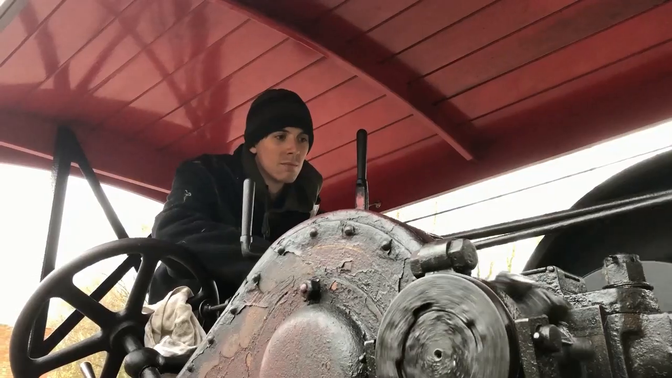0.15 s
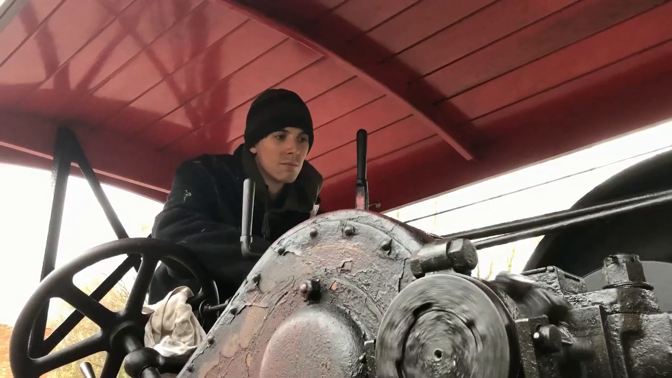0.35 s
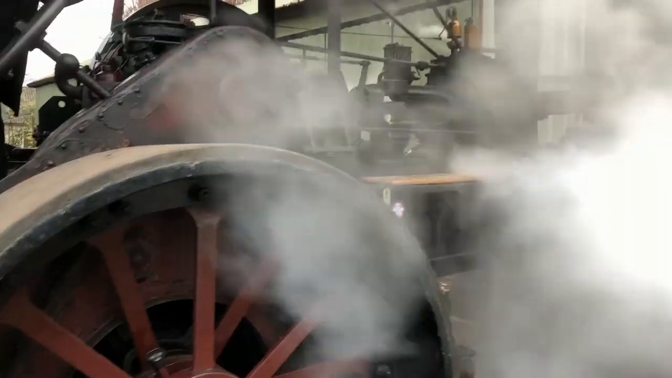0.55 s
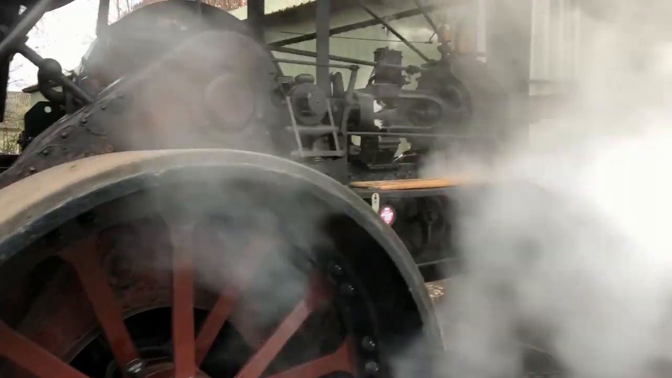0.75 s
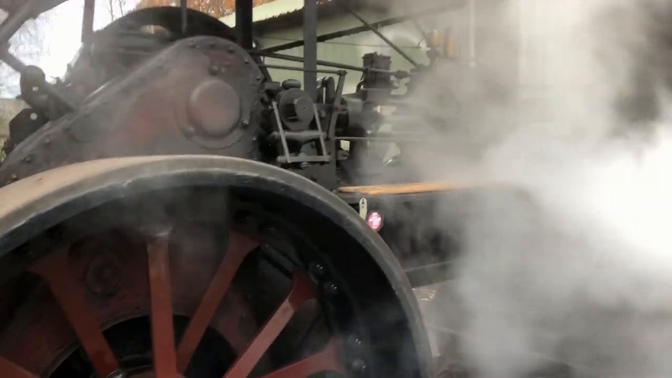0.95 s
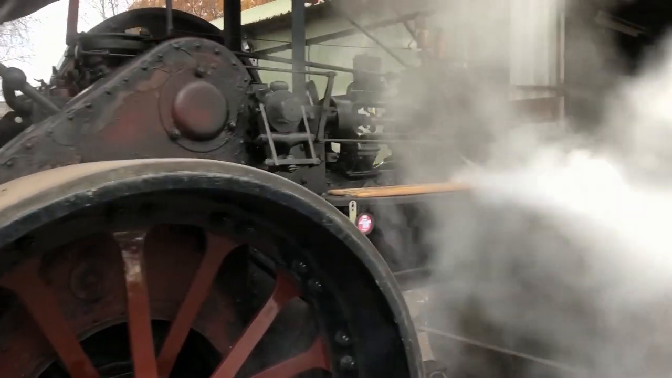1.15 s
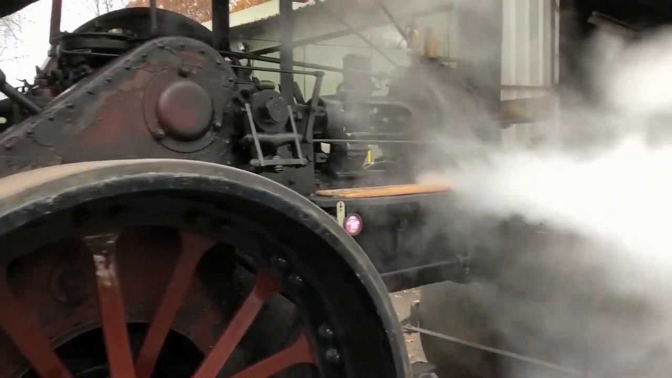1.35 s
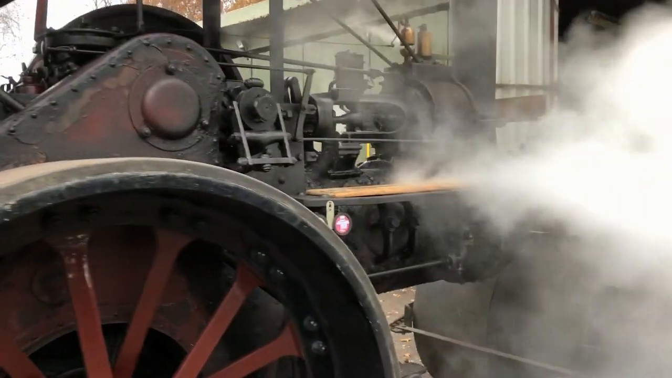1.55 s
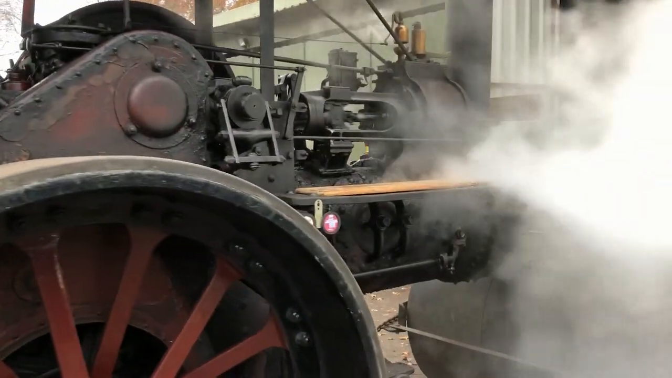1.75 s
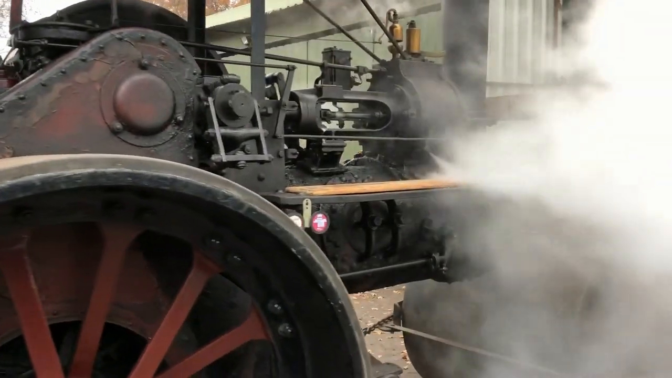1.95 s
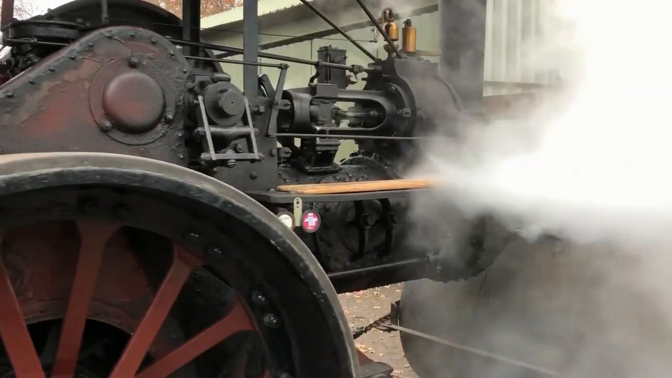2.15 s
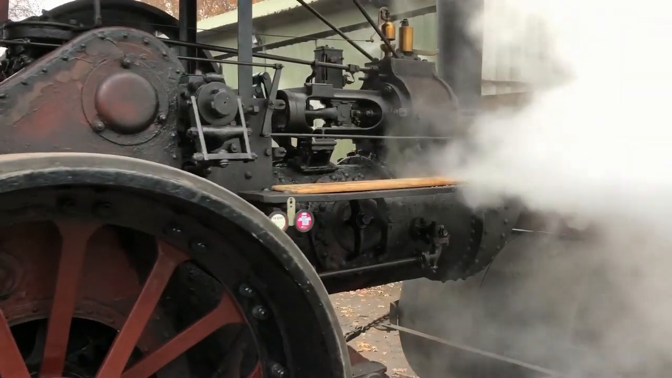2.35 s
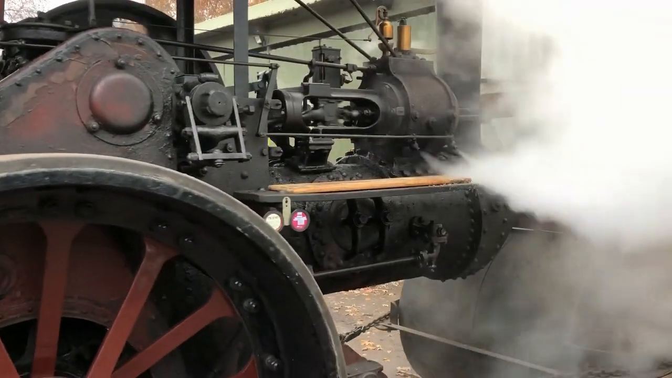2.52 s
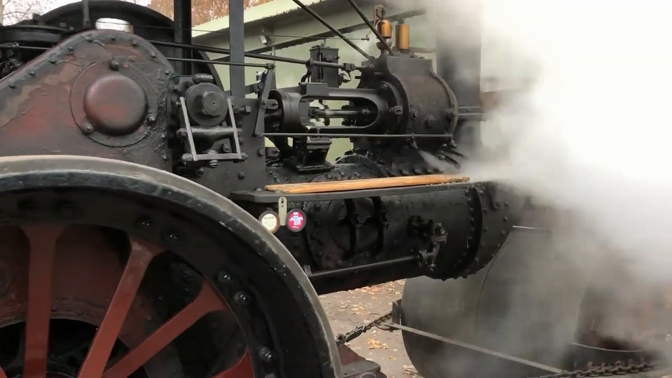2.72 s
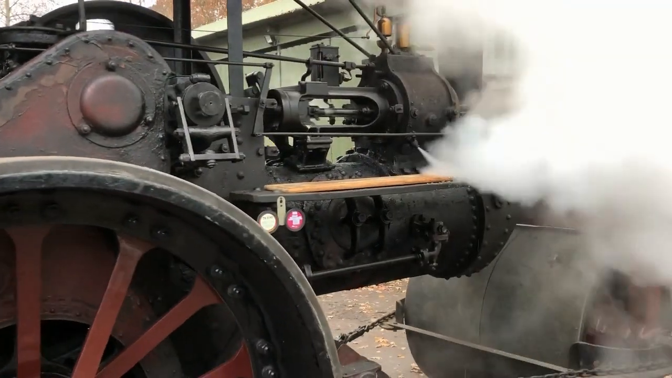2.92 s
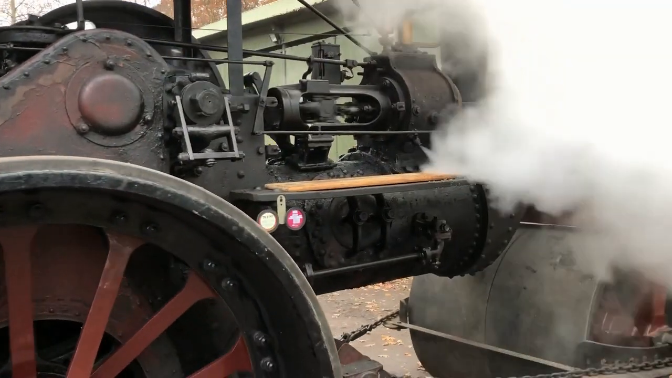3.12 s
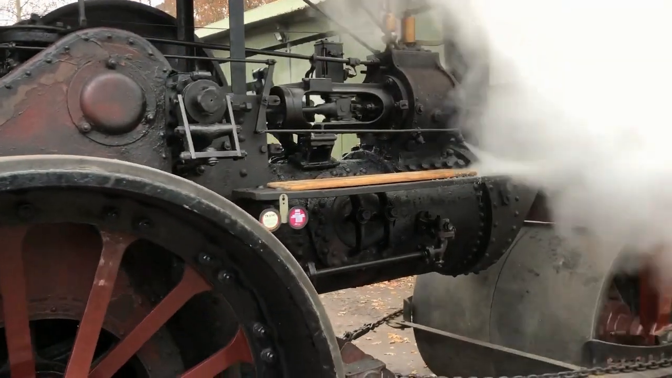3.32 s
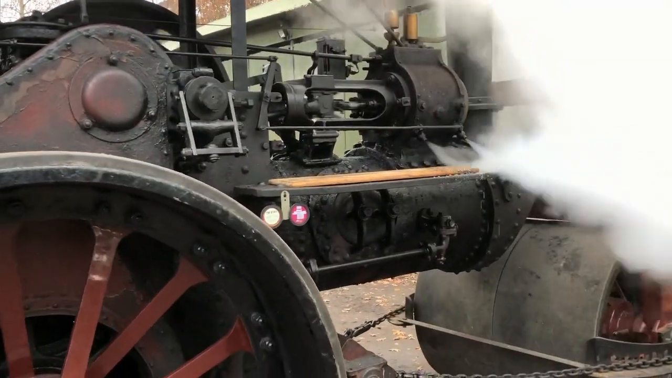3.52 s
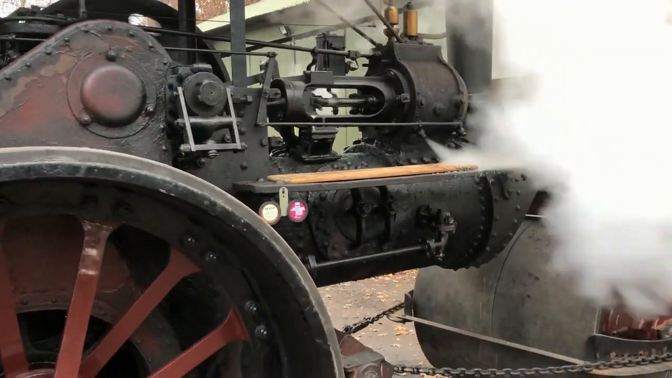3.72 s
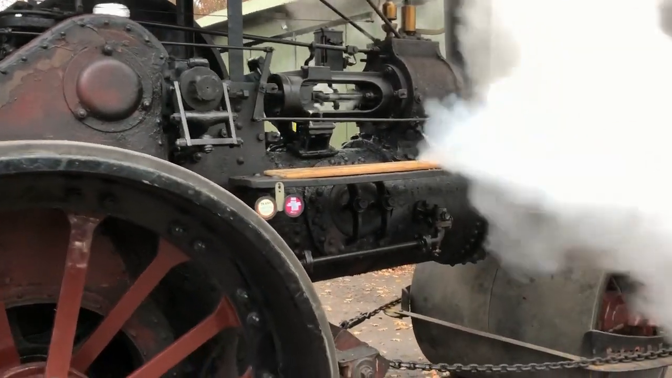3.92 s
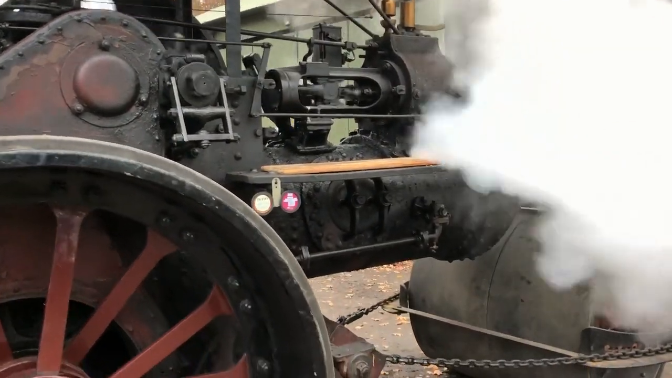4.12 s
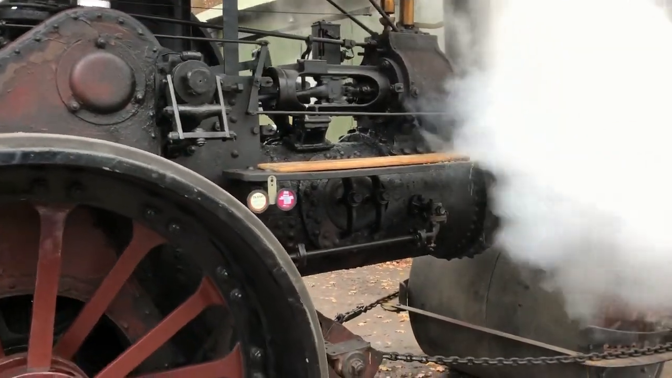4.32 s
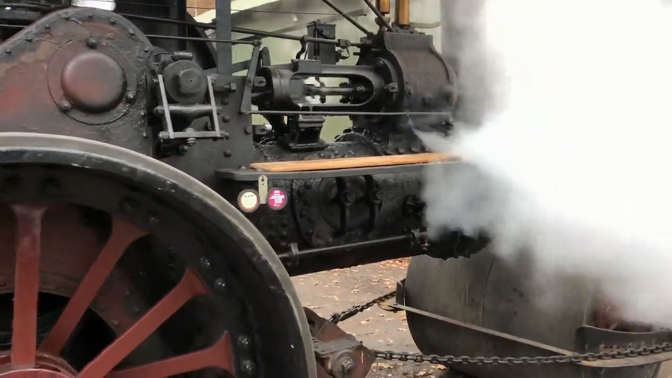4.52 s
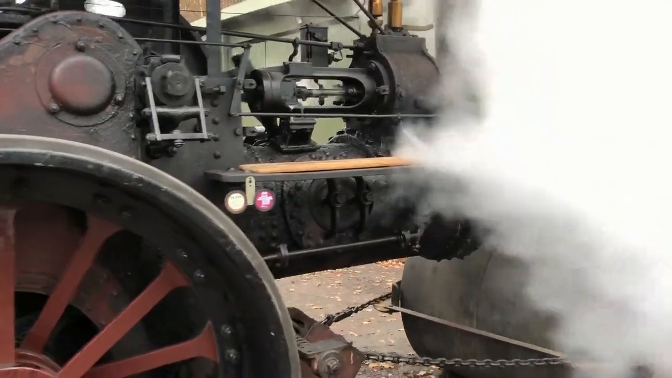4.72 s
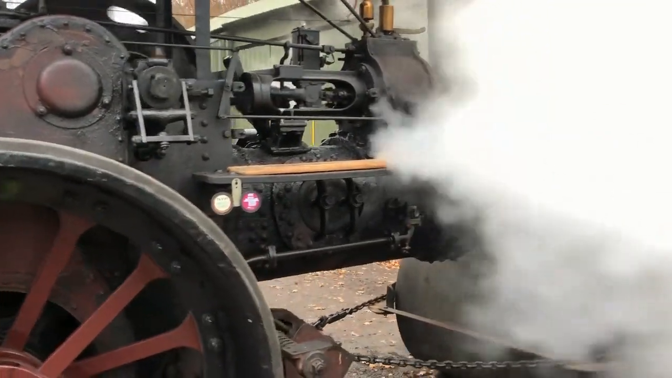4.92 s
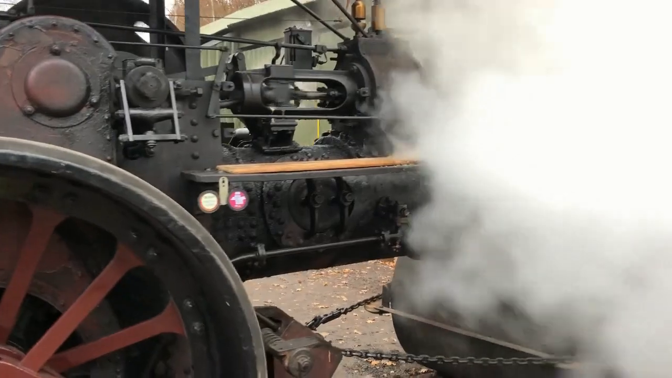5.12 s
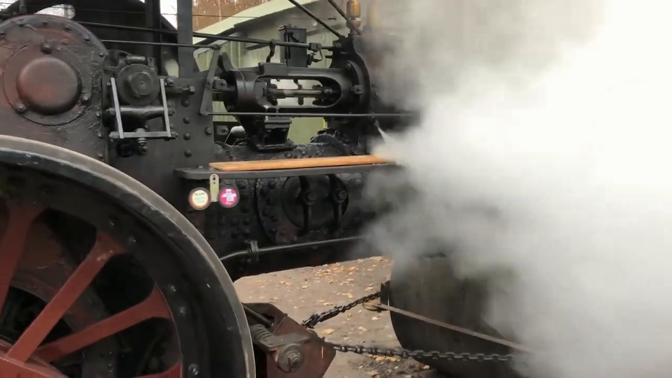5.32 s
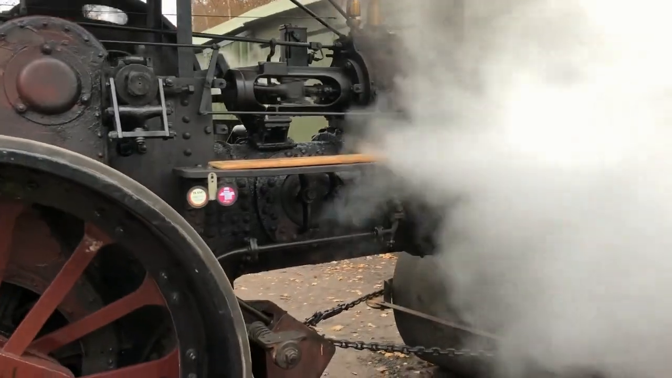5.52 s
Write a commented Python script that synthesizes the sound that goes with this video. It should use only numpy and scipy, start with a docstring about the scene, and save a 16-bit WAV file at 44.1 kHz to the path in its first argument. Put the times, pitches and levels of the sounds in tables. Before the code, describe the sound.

A steam engine ticks over quietly for half a second, then cuts to loud, hard, rhythmic blasts of hissing steam over a low rumble.

```python
"""In a yard a steam roller ticks over quietly; after a short break it is heard working with the drain cocks open.
Most piston strokes let out a weak puff, then a hard blast: shaped noise whose hiss and roar vary, with spitting.
The exhaust thuds low as sagging sine tones, and the boiler rumbles as lumpy low noise with a passing drone.
Noise ticks, a clank and a faint hiss make up the idling; once a flung drop pops as falling tones."""
import sys
import numpy as np
from scipy import signal
from scipy.fft import rfft, irfft, next_fast_len
from scipy.io import wavfile
from scipy.ndimage import uniform_filter1d

SR = 44100
rng = np.random.default_rng(int(sys.argv[2]) if len(sys.argv) > 2 else 0)


def digitize_waveform(pressure):
    """Quantize a signal to 16-bit integers and store it at the path in sys.argv[1].

    Rows of a 2-D input are taken as channels; values are limited to [-1, 1].
    """
    field = np.atleast_2d(pressure).T
    bounded = np.clip(field, -1, 1)
    quanta = np.round(bounded * 32767).astype(np.int16)
    wavfile.write(sys.argv[1], SR, quanta)


N = 245195
TIME = np.arange(N) / SR
SIZE = next_fast_len(N, real=True)
FREQS = np.fft.rfftfreq(SIZE, 1 / SR)

# One blast a piston stroke, levels before the trims in drain_cocks. Each row: start in seconds, attack in
# seconds, hold in seconds, hiss in dB, sag over the hold in dB, roar against hiss in dB, change of hiss at the
# opening in dB, lift of lowest and highest bands in dB.
STROKE_BLASTS = [ (.535, .008, .064, -25.5, 3.5, -14.5, -2.5, 1),
                 (0.765, 0.023, 0.27, -20.5, 10.5, -12.5, 0, 6.5),
                 (1.183, 0.014, 0.26, -16, 10, -16, 0.5, -1.5),
                 (1.62, .013, 0.26, -16.5, 8.5, -13.5, -2.5, 6), (2.045, .006, 0.24, -15.5, 7, -15, 0, 0.5),
                 (2.478, 0.011, 0.27, -17.5, 3, -12.5, 0, 2.5),
                 (2.922, .008, 0.27, -15.5, 3, -14.5, 0.5, 1.5), (3.393, 0.012, 0.33, -17, 1, -14.5, -2, 2),
                 (3.886, .005, 0.32, -16.5, 2, -15.5, 1.5, -1.5),
                 (4.342, 0.012, 0.3, -17, 1.5, -19, -1, 4.5),
                 (4.757, .018, 0.17, -15.5, -3, -18.5, -1.5, -1),
                 (5.064, 0.011, 0.2, -16.5, 3.5, -20, -0.5, 0.5),
                 (5.376, 0.0067, 0.18, -25, 2.5, -6.5, 4.5, -0.5), ]
# A weak puff leads most blasts. Each row: start in seconds, attack in seconds, hiss in dB before the trims,
# fade in dB per second, roar against hiss in dB.
LEADING_PUFFS = [(.672, 0.033, -32, 160, -14), (1.11, 0.017, -36.5, 35, -11),
                 (1.533, 0.018, -30, 78, -11.5), (1.964, .028, -31, 51, -11), (2.385, 0.027, -27, 82, -10),
                 (2.834, 0.032, -28, 68, -12), (3.292, 0.03, -29, 77, -8), (3.788, 0.033, -29.5, 44, -11.7),
                 (4.245, .033, -33.5, 100, -7), (4.722, 0.0065, -30, 60, -8.5),
                 (4.998, .016, -28, 214, -20)]
# Brief changes in the jet: hiss and roar each dip or swell, most often hiss down and roar up. Each row: middle in
# seconds, half length in seconds, hiss lost in dB, roar gained in dB.
JET_CHANGES = [(0.886, 0.035, 5, 0.5), (1.334, 0.07, 5, 5), (2.108, 0.021, 3, 4), (2.186, 0.062, 5.5, 6.5),
               (2.529, 0.022, -2, 4), (3.05, 0.11, 5.5, 8), (3.456, 0.025, -1, 6), (3.933, 0.0068, 4, -5),
               (3.973, 0.03, 0, 6), (4.055, 0.0081, -3.5, 8.5), (4.112, 0.051, -3, -5), (4.82, 0.088, 9, 4),
               (5.467, 0.012, 6.5, -2)]


def steam_flow(roar_sag=0.58, roar_close=0.75, opening_s=0.014, close_db_per_s=354, close_ease_s=0.009,
               weep_hiss_db=-51, weep_roar_db=-54.5, weep_rise_db_per_s=1.27):
    """Levels in dB of hiss and roar: blasts open, sag and cut off, puffs swell and fade, and the jet varies."""
    # the open cocks never fall quite silent, and weep more as they warm
    weep = weep_rise_db_per_s * TIME
    hiss_power = amp(weep_hiss_db + weep) ** 2
    roar_power = amp(weep_roar_db + weep) ** 2
    for start, attack, hold, db, sag_db, wet_db, opening_db, _ in STROKE_BLASTS:
        age = np.maximum(TIME - start, 0)
        opening = np.minimum(age / attack, 1)
        sag = sag_db * np.minimum(age / hold, 1)
        # the valve eases into its cut-off
        closing = close_db_per_s * close_ease_s * np.logaddexp(0, (age - hold) / close_ease_s)
        # the hiss opens a little stronger or weaker from blast to blast
        onset = opening_db * bump(start + attack, opening_s)
        hiss_power += (opening * amp(db + onset - sag - closing)) ** 2
        # the roar loses only a share of what the hiss loses
        roar_power += (opening * amp(db + wet_db - roar_sag * sag - roar_close * closing)) ** 2
    for start, attack, db, fade, wet_db in LEADING_PUFFS:
        age = np.maximum(TIME - start, 0)
        puff = np.minimum(age / attack, 1) * amp(db - fade * np.maximum(age - attack, 0))
        hiss_power += puff ** 2
        roar_power += (puff * amp(wet_db)) ** 2
    hiss = 10 * np.log10(hiss_power)
    roar = 10 * np.log10(roar_power)
    for middle, half_length, hiss_loss_db, roar_gain_db in JET_CHANGES:
        change = bump(middle, half_length)
        hiss = hiss - hiss_loss_db * change
        roar = roar + roar_gain_db * change
    return hiss, roar


# The cock's mouth half whistles in some strokes. Each row: middle in seconds, half length in seconds, pitch at the
# middle in Hz, level in dB before the whistle trim in drain_cocks.
HALF_WHISTLES = [(1.15, .04, 6650, -8), (1.299, 0.22, 7100, -6.5), (2.1, .17, 6450, -5),
                 (2.98, .12, 6350, -8), (3.603, 0.49, 9140, -18), (3.967, 0.13, 6360, -11),
                 (4.3, .08, 7950, -13)]


def whistle(width_hz=300, sag_hz_per_s=1100):
    """Narrow bands of noise at the cock's mouth swell and fade, sinking in pitch as the pressure is spent."""
    out = np.zeros(N)
    in_phase, across = wander(width_hz), wander(width_hz)
    for middle, half_length, hz, db in HALF_WHISTLES:
        pitch = hz - sag_hz_per_s * np.clip(TIME - middle, -.15, .15)
        angle = 2 * np.pi * np.cumsum(pitch) / SR
        narrow_noise = in_phase * np.cos(angle) + across * np.sin(angle)
        out += amp(db) * bump(middle, half_length) * narrow_noise
    return out


def swirl(x, swirl_db=1.5, wide_hz=200, long_s=.09):
    """The colour of the rush shifts in small random patches."""
    hz, t, z = signal.stft(x, SR, nperseg=1024)
    patches = rng.standard_normal(z.shape)
    patches = uniform_filter1d(patches, max(round(wide_hz / hz[1]), 1), axis=0)
    patches = uniform_filter1d(patches, max(round(long_s / t[1]), 1), axis=1)
    _, shifted = signal.istft(z * amp(swirl_db * unit(patches)), SR, nperseg=1024)
    return unit(shifted[:N])


# Colour of the steam jet. Each row: frequency in Hz, relative level in dB per Hz.
JET_COLOUR = [(130, -26), (220, -12), (350, -12.5), (526, -10), (575, -9), (675, -11), (793, -9.5),
              (1130, -6.5), (1240, -6.5), (1400, -4.5), (2350, -3.5), (6480, -1), (15500, -7.5)]
# Hollows between boiler and wheels that the jet sets ringing. Each row: frequency in Hz, width in Hz, lift in dB.
RINGING_HOLLOWS = [(714, 46, 4), (1145, 37, 2), (1700, 51, 2), (2066, 20, 2.5), (2517, 25, 0),
                   (3980, 34, 5)]


def drain_cocks(hiss_db=-.5, whistle_db=-3, flutter_db=1.0, sputter_db=0.75, surge_db=1.0, sputter_hz=20.9,
                patch_db=1.0, spit_db=-22, spits_per_s=600):
    """A turbulent jet: wet steam sputters and spits, its low bands moving with the roar and its high with the hiss."""
    hiss, roar = steam_flow()
    gain = colour(JET_COLOUR) * lifts(RINGING_HOLLOWS)
    hiss_share = band_share(gain, 6000, 15000)
    roar_share = band_share(gain, 900, 3200)

    # droplets burst at the nozzle as tiny cracks within the rush
    spits = (rng.random(N) < spits_per_s / SR) * rng.standard_normal(N)
    jet = shaped(rng.standard_normal(N) + amp(spit_db) * unit(spits), gain)
    rush = swirl(jet) + amp(whistle_db) * whistle()

    # hiss and roar surge together, and each also flickers on its own
    surge = surge_db * wander(sputter_hz)
    hiss = hiss + hiss_db + surge + flutter_db * wander(68) - 20 * np.log10(hiss_share)
    roar = roar + surge + sputter_db * wander(70) - 20 * np.log10(roar_share)

    # each stroke lifts or lowers the lowest and the highest bands together
    start, _, hold, *_, stroke_lift_db = np.transpose(STROKE_BLASTS)
    outer_lift = np.interp(TIME, start + hold / 2, stroke_lift_db)

    # Large eddies (low bands) follow the roar, small ones the hiss.
    # Each row: band centre in Hz, share of roar, share of the stroke's lift.
    bands = [(500, 1.0, 0.94), (1350, 1, 0), (2650, 0.9, 0.0063), (4780, 0.54, 0.0),
             (6960, 0.041, 0), (9000, -0.048, 0.39), (14300, -0.023, 0.58)]
    out = np.zeros(N)
    for band, (_, roar_part, lift_part) in zip(split(rush, [row[0] for row in bands]), bands):
        flow = roar_part * roar + (1 - roar_part) * hiss
        out += band * amp(flow + lift_part * outer_lift + patch_db * wander(23))
    return out


# Exhaust thuds. Each row: start in seconds, level of the tone in dB, time to fall 60 dB in seconds.
EXHAUST_THUDS = [(0.287, -36, 0.34), (0.684, -43, .12), (1.117, -37.5, 0.19), (1.999, -54, .14),
                 (2.414, -53, .14), (2.854, -48, .14), (3.304, -43, .25), (3.809, -37.5, .3),
                 (4.261, -42, 0.18), (4.566, -33, 0.054), (4.667, -43, .12), (5.002, -46, .12),
                 (5.325, -42, .1)]


def exhaust(pipe_hz=94, sag_hz=32, sag_s=0.057, rise_s=0.0048, rough=0.26, stagger=.1):
    """Each release of steam rings the chimney's air column, whose pitch staggers and sags as the puff is spent."""
    t, out = np.arange(SR // 3) / SR, np.zeros(N)
    sagging_hz = pipe_hz - sag_hz * (1 - np.exp(-t / sag_s))
    gusts = wander(60)
    eddies = noise(colour([(30, -12), (60, 7), (140, -6), (250, -8), (800, -50)]))  # (Hz, dB per Hz)
    for k, (s, db, t60) in enumerate(EXHAUST_THUDS):
        own = slice(k * len(t), (k + 1) * len(t))  # fresh gusts and eddies for every thud
        swell = (1 - np.exp(-(t / rise_s) ** 2)) * amp(-60 * t / t60)
        turns = np.cumsum(sagging_hz * (1 + stagger * gusts[own])) / SR
        puff = np.sin(2 * np.pi * turns) + rough * eddies[own]
        add(out, s, amp(db) * swell / swell.max() * puff)
    return out


# The drop strikes, then spreads over the port. Each row: start in seconds, first pitch in Hz, last pitch in Hz,
# glide in seconds, hold in seconds, level in dB before the roughening.
DROP_POPS = [(4.4734, 1900, 294, 0.00218, 0.00083, -22.5), (4.483, 704, 64, 0.0037, 0.011, -14.5)]


def drop_on_microphone(fade_s=.007, rough=0.21, splat_db=-19, splat_s=0.0086):
    """Wet pops whose pitch slides from a splat down to a thump, with a brief burst of noise."""
    t, out = np.arange(SR // 12) / SR, np.zeros(N)
    for s, top_hz, end_hz, glide_s, hold_s, db in DROP_POPS:
        turns = np.cumsum(end_hz + (top_hz - end_hz) * np.exp(-t / glide_s)) / SR
        fade = np.exp(-np.maximum(t - hold_s, 0) / fade_s)
        add(out, s, amp(db) * fade * np.sin(2 * np.pi * turns))
    age = np.maximum(TIME - DROP_POPS[0][0], 0)
    # (Hz, dB per Hz)
    splat = noise(colour([(100, -1), (250, 7), (450, -8), (1200, 3), (1800, -10), (2600, -5), (3500, -35)]))
    splat *= (age > 0) * np.exp(-(age / splat_s) ** 2)
    return out * (1 + rough * wander(500)) + amp(splat_db) * splat


# Ticks of the valve gear. Each row: start in seconds, level in dB before the tick trim.
GEAR_TICKS = [(0.0054, -23), (0.1576, -19), (0.294, -28), (0.2973, -19), (0.4413, -20), (0.4763, -36)]
# Colour of the ticks. Each row: frequency in Hz, relative level in dB per Hz.
GEAR_COLOUR = [(470, -32), (800, -13), (2030, -9), (2870, -8), (3090, -11), (5080, -5), (6840, -10),
               (8230, -3.5), (15500, -19)]


def valve_gear(tick_db=-6, crack_s=0.00036, ring_db=-10, ring_t60=0.074):
    """Sharp metal ticks with a short dense ring under the canopy, made of fading noise."""
    t, out = np.arange(SR // 6) / SR, np.zeros(N)
    fade = np.exp(-t / crack_s) + amp(ring_db - 60 * t / ring_t60)
    for s, db in GEAR_TICKS:
        add(out, s, amp(db + tick_db) * fade * rng.standard_normal(len(t)))
    return shaped(out, unit(colour(GEAR_COLOUR)))


# Modes of the loose rod. Each row: frequency in Hz, relative level in dB, time to fall 60 dB in seconds.
ROD_MODES = [(595, -16, .05), (721, -6, .04), (900, -1, .03), (1150, 0, 0.036), (1400, -2, .05),
             (1600, -12, .03), (3100, -15, .02)]


def rod(s=.128, clank_db=-44, rattle_s=0.0097):
    """A loose rod clanks once: a fading noise rattle in its bearing sets its modes ringing."""
    t, out = np.arange(SR // 8) / SR, np.zeros(N)
    ring = sum(amp(db - 60 * t / t60) * np.sin(2 * np.pi * hz * t) for hz, db, t60 in ROD_MODES)
    rattle = rng.standard_normal(len(t)) * np.exp(-t / rattle_s)
    clank = signal.fftconvolve(ring, rattle)
    add(out, s, amp(clank_db) * clank / clank.std() / 3)
    return out


# Colour of the idling. Each row: frequency in Hz, relative level in dB per Hz.
IDLE_COLOUR = [(24, -23), (40, -3), (224, -7), (266, -12), (484, -13), (562, -7.5), (637, -11), (838, -9.5),
               (1020, -12), (2570, -23.5), (5860, -20.5), (15500, -28.5)]
# The gland's hiss rings faintly. Each row: frequency in Hz, width in Hz, lift in dB.
GLAND_RINGS = [(5950, 600, 4), (9900, 700, 4)]
# The gland's faint hiss dies away. Each row: time in seconds, gain in dB.
GLAND_LEAK = [(0, 0.5), (.27, -2.5), (.36, -8), (.52, -18)]


def idling(level_db=-47.5, leak_hz=2500):
    """The boiler simmers as steady low noise under the fading treble hiss of a leaking gland."""
    air = noise(colour(IDLE_COLOUR) * lifts(GLAND_RINGS)) * amp(level_db)
    simmer = shaped(air, 1 / (1 + (FREQS / leak_hz) ** 4))
    leak = air - simmer
    return simmer + leak * amp(np.interp(TIME, *np.transpose(GLAND_LEAK)))


# Colour of the boiler's rumble. Each row: frequency in Hz, relative level in dB per Hz.
BOILER_COLOUR = [(30, -23), (55, -9), (105, -10.5), (135, -4.5), (165, -0.5), (200, -1.5), (270, -1.5),
                 (340, -4), (430, -9.5), (800, -13), (1500, -21), (3000, -56)]
# Strength of the draught. Each row: time in seconds, level in dB before the rumble trim.
DRAUGHT = [(.56, -49), (1.3, -44), (2.0, -40.5), (2.75, -43), (3.1, -44), (3.35, -41.5), (4.2, -47.5),
           (5.55, -47.5)]


def boiler(rumble_db=-1.5, lump_db=4.5, lump_hz=25, drone_hz=162, drone_drift=.015, drone_db=-48,
           drone_middle_s=2.03, drone_half_s=.45):
    """The draught rumbles through the fire, each register in its own lumps; at its strongest the chimney drones."""
    registers = split(noise(colour(BOILER_COLOUR)), [160, 270, 420])
    lumpy = sum(band * amp(lump_db * wander(lump_hz)) for band in registers)
    rumble = unit(lumpy) * amp(np.interp(TIME, *np.transpose(DRAUGHT)) + rumble_db)
    turns = np.cumsum(drone_hz * (1 + drone_drift * wander(14))) / SR
    drone = np.sqrt(2) * np.sin(2 * np.pi * turns) * amp(drone_db) * bump(drone_middle_s, drone_half_s)
    return rumble + drone


# Reflections from the ironwork and the ground. Each row: delay in seconds, gain in dB before the treble scatters.
CLOSE_REFLECTIONS = [(.00146, -19), (.00196, -18.5), (.00442, -11.5), (.0058, -22), (.0092, -19)]


def surroundings(x, yard_db=-19, yard_t60=0.15, mirror_hz=3200):
    """Close reflections comb the sound; rough surfaces scatter the treble, and the yard adds a short tail."""
    tail = rng.standard_normal(N) * amp(-60 * TIME / yard_t60)
    echoes = np.zeros(N)
    for delay, db in CLOSE_REFLECTIONS:
        add(echoes, delay, amp([db]))
    response = shaped(echoes, 1 / (1 + (FREQS / mirror_hz) ** 2))
    response += amp(yard_db) * tail / np.linalg.norm(tail)
    response[0] += 1  # the direct sound
    return signal.fftconvolve(x, response[:SR // 2] / np.linalg.norm(response))[:N]


def amp(db):
    """Decibels to gain."""
    return 10 ** (np.asarray(db) / 20)


def unit(x):
    """Scales to an rms of 1."""
    return x / np.sqrt(np.mean(x ** 2) + 1e-20)


def colour(points):
    """Gain at every frequency, from (Hz, dB) points joined on a log axis."""
    hz, db = np.transpose(points)
    return amp(np.interp(np.log(FREQS + 1), np.log(hz + 1), db))


def lifts(peaks):
    """Gain at every frequency from resonances (Hz, width Hz, lift dB)."""
    return amp(sum(db / (1 + (2 * (FREQS - hz) / width) ** 2) for hz, width, db in peaks))


def band_share(gain, low_hz, high_hz):
    """Share of a colour's whole amplitude that lies between two frequencies."""
    inside = (FREQS > low_hz) & (FREQS < high_hz)
    return np.linalg.norm(gain[inside]) / np.linalg.norm(gain)


def shaped(x, gain):
    """Filters x by a gain per frequency."""
    return irfft(rfft(x, SIZE) * gain, SIZE)[:N]


def split(x, centres_hz):
    """Overlapping bands that add up to x."""
    spectrum, log_hz = rfft(x, SIZE), np.log(FREQS + 1)
    weights = [np.interp(log_hz, np.log(centres_hz), pick) for pick in np.eye(len(centres_hz))]
    return [irfft(spectrum * weight, SIZE)[:N] for weight in weights]


def noise(gain):
    """Noise of rms 1 with the given colour."""
    return unit(shaped(rng.standard_normal(N), gain))


def wander(rate_hz, size=16384):
    """Random drift of about rms 1, falling off gently above the given rate."""
    hz = np.fft.rfftfreq(size, N / SR / size)
    drift = irfft(rfft(rng.standard_normal(size)) / (1 + (hz / rate_hz) ** 2))
    return np.interp(TIME, np.linspace(0, N / SR, size), unit(drift))


def bump(middle, half_length):
    """A smooth swell from 0 to 1 and back."""
    return np.exp(-((TIME - middle) / half_length) ** 2)


def add(mix, s, sound):
    """Mixes a sound in at time s."""
    part = mix[max(round(s * SR), 0):][:len(sound)]
    part += sound[:len(part)]


def scene():
    """First the idling engine, then the working one, the exhaust under both; both channels alike."""
    working = TIME > np.mean(SILENCES[0])  # the sound cuts from idling to working within the first silence
    quiet = idling() + valve_gear() + rod()
    loud = surroundings(drain_cocks()) + boiler() + drop_on_microphone()
    return np.tile(np.where(working, loud, quiet) + exhaust(), (2, 1))


# Short silences. Each row: start in seconds, end in seconds.
SILENCES = [(0.518, 0.5412), (0.553, 0.564)]


def record(dry, low_cut_hz=38, edge_hz=15900):
    """The microphone sheds deep bass and rounds the tallest peaks; the sound drops out twice; the top is cut."""
    lean = signal.sosfilt(signal.butter(2, low_cut_hz, "highpass", fs=SR, output="sos"), dry)
    rounded = lean / (1 + (np.abs(lean) / .7) ** 6) ** (1 / 6)
    live = np.ones(N)
    for start, end in SILENCES:
        live[(TIME > start) & (TIME < end)] = 0
    heard = rounded * uniform_filter1d(live, size=60)  # softened edges
    top_cut = signal.firwin(511, edge_hz, window=("kaiser", 9), fs=SR)
    return signal.oaconvolve(heard, top_cut[None], "same")


dry = scene()
out = record(dry)
digitize_waveform(out)
```